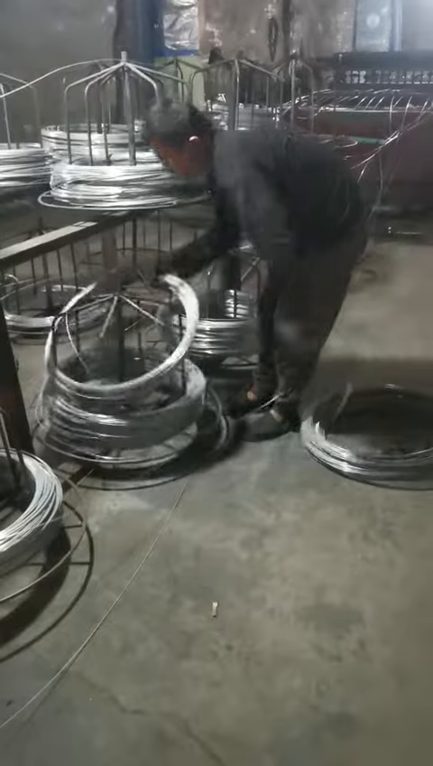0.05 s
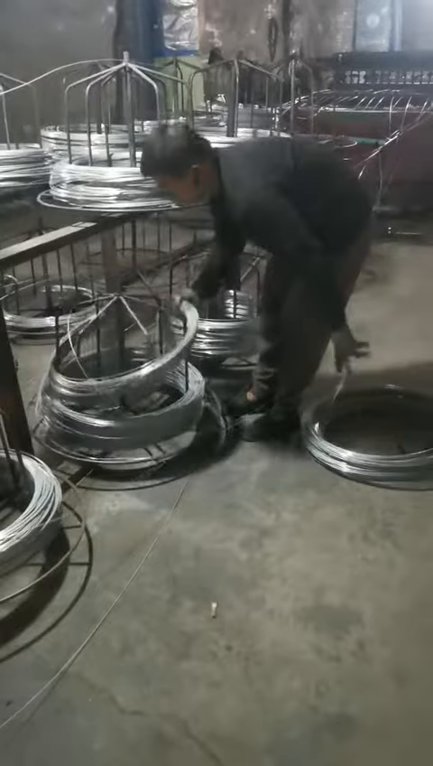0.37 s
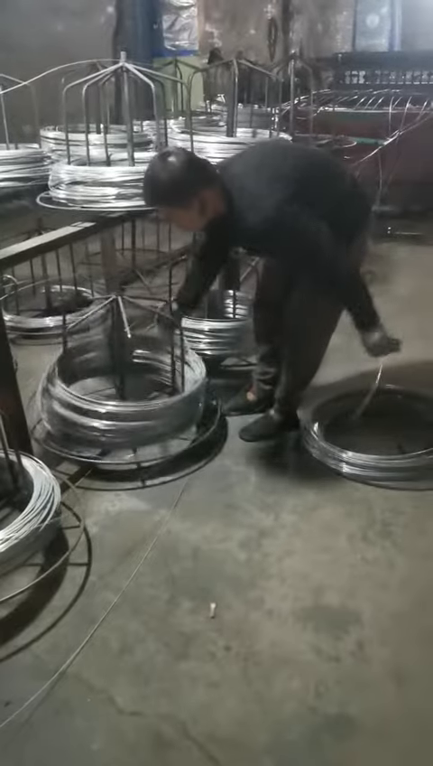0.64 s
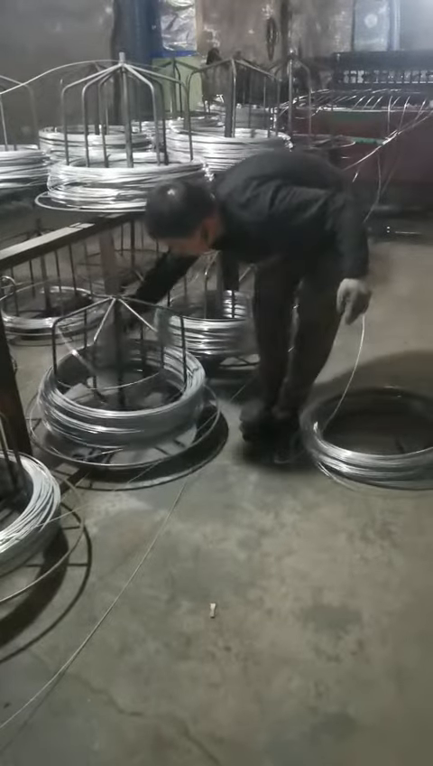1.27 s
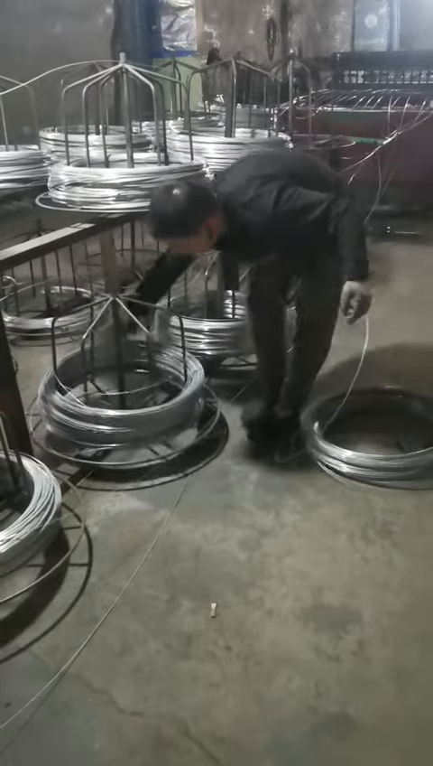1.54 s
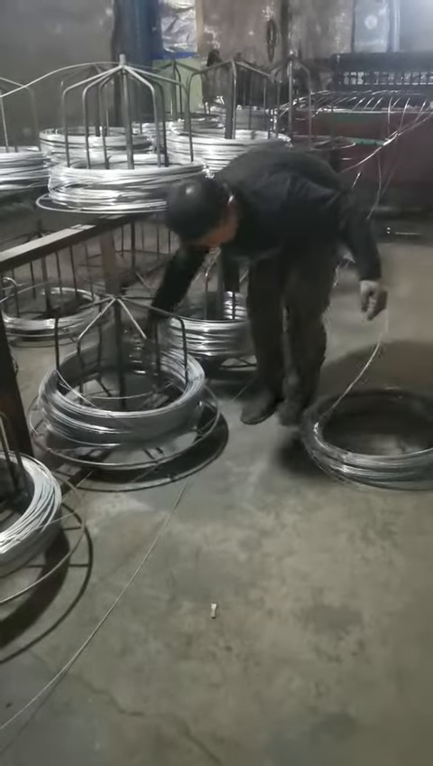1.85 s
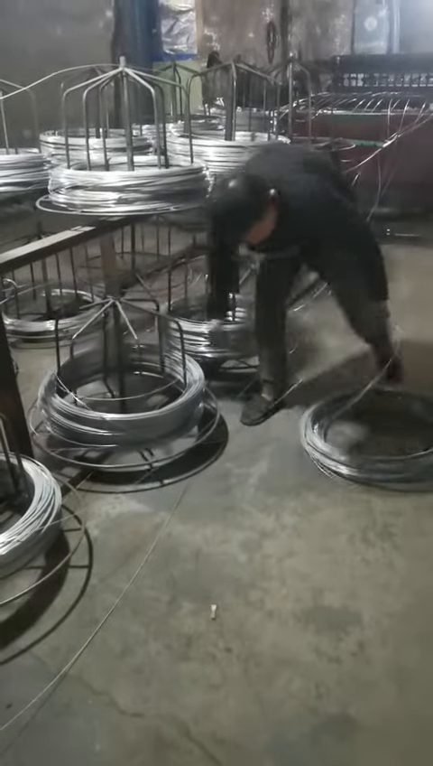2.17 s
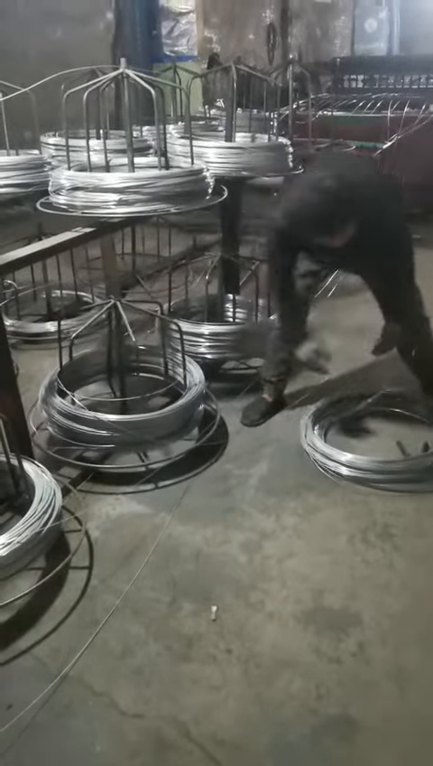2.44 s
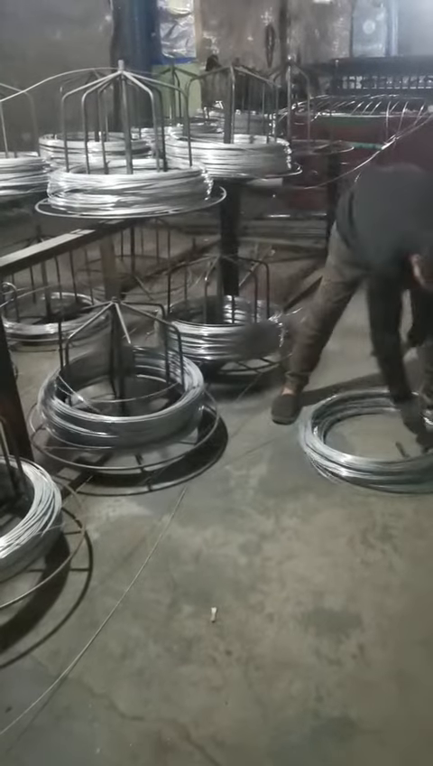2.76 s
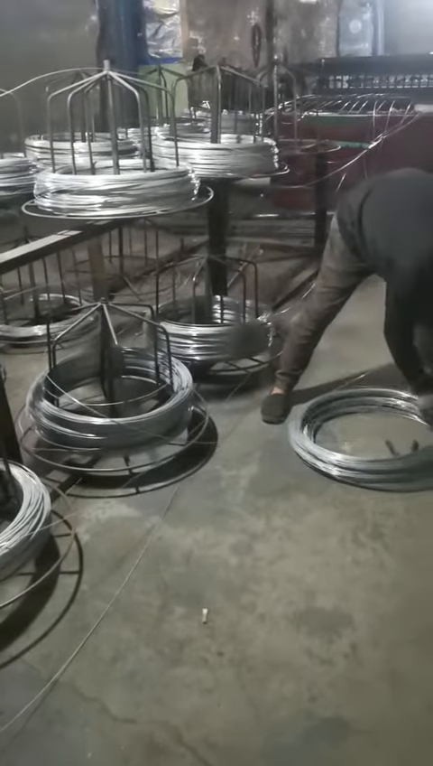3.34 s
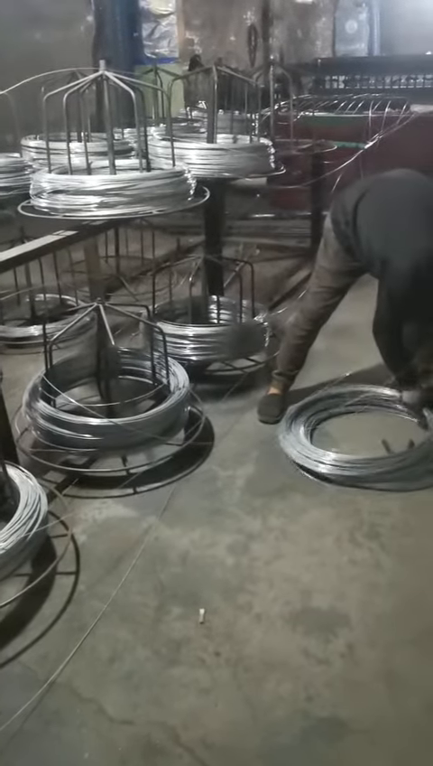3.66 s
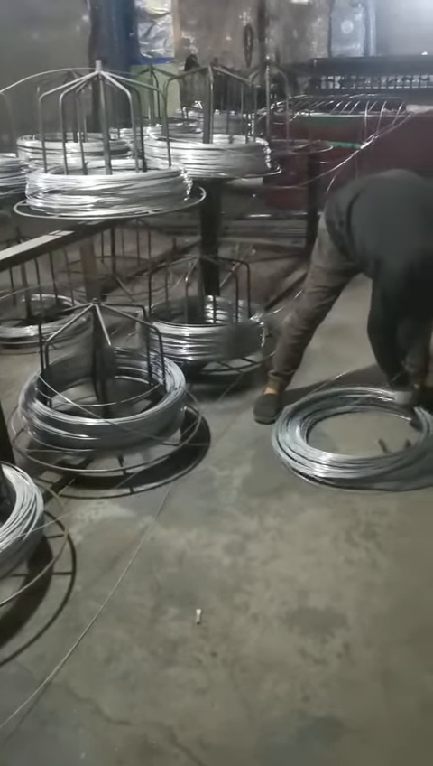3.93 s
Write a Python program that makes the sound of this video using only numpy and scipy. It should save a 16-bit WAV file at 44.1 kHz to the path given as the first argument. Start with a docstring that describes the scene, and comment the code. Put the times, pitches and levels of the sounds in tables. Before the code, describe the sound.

A steel wire coil drops onto a metal stand, clanking and rattling over low machine hum.

```python
"""In a hard-walled workshop, a coil of steel wire drops over a wire stand, off to the right.
Its turns hiss as they rub past each other, knock the frame so that it rings, and rattle as they settle.
One freed turn sings on. A shoe taps and scuffs the concrete, and a second coil is nudged along the floor.
Behind it all are a soft rumble and the hum of a machine, which fades near the end."""
import sys
import numpy as np
from scipy import signal
from scipy.fft import rfft, irfft, next_fast_len
from scipy.io import wavfile
from scipy.ndimage import uniform_filter1d

SR = 44100
rng = np.random.default_rng(int(sys.argv[2]) if len(sys.argv) > 2 else 0)


def write(x):
    x = np.atleast_2d(x).T
    wavfile.write(sys.argv[1], SR, np.round(np.clip(x, -1, 1) * 32767).astype(np.int16))


N = 176400  # 4 seconds

# A COLOUR table says how strong low and high pitches are; a LOUDNESS table, how a sound swells and fades.
# Background rumble and hiss
AIR_TONE_COLOUR = [(20, -5.5), (50, 9), (100, 5), (180, 2.5), (380, 0), (600, -8.5), (1000, -14),
                   (1400, -11.5), (2000, -16.5), (3000, -17.5), (5000, -29.5), (7800, -28), (10000, -49),
                   (15000, -47.5)]  # f/Hz, level/dB
AIR_LOUDNESS = [(0, -47.5), (.22, -50), (.38, -63), (.8, -54.5), (2.6, -54), (3.2, -54), (3.6, -58.5),
                (4, -59)]  # t/s, level/dB
# The machine's hum
HUM_TONES = [(50, -71.5, 0), (76.6, -52.5, 1), (91.6, -59.5, 1), (120, -74.5, 0.9), (152, -60.5, 0.41),
             (167.2, -62, 0.4), (215.8, -65.5, 0.6), (260.9, -66.5, 1), (300.2, -66, 0.05)]  # f/Hz, level/dB, how much the tone follows HUM_LOUDNESS (0 to 1)
HUM_LOUDNESS = [(0, 0), (.2, 3.5), (.4, -9), (.6, -6), (.85, -1.5), (3.1, -2), (3.3, -10.5), (3.6, -15),
                (4, -30)]  # t/s, level/dB
# Wire sliding on wire
SLIDE_LOUDNESS = [(0, -48.5), (.08, -62), (.19, -63.5), (.23, -50), (.335, -43.5), (.365, -38.5),
                  (.395, -37.5), (.425, -42.5), (.5, -48), (.6, -46.5), (.635, -51.5), (.67, -44),
                  (.72, -52.5), (.83, -54), (.97, -55), (1.12, -60), (1.18, -57.5), (1.22, -59),
                  (1.28, -53.5), (1.46, -63.5), (1.55, -52), (1.66, -67), (1.8, -74), (2.1, -93)]  # t/s, level/dB
SLIDE_TONE_COLOUR = [(300, -17), (1500, -40.5), (2600, -16), (3000, -7), (3400, -18), (5000, -10.5),
                     (6000, -9.5), (7000, -2.5), (7800, 3.5), (8600, -6.5), (9800, -12), (15000, -18.5)]  # f/Hz, level/dB
# Small bumps between the settling turns
RATTLE_LOUDNESS = [(0, -46.5), (.2, -57.5), (.4, -55.5), (.5, -44.5), (.62, -47.5), (.74, -50),
                   (.93, -48.5), (1.2, -51.5), (1.35, -56), (1.55, -56), (1.8, -63.5), (2.2, -67),
                   (2.7, -75)]  # t/s, level/dB
RATTLE_TONE_COLOUR = [(200, -17), (500, -2.5), (1050, -5.5), (1500, -1.5), (1900, 2.5), (2400, -2.5),
                      (2950, 2), (3350, -1.5), (4400, -3), (5700, -10), (8000, -14.5), (15000, -41)]  # f/Hz, level/dB
# Blows on the stand: t/s, level/dB, body/dB (up to 1150 Hz), middle/dB (2000 Hz), edge/dB (4600 Hz),
# treble/dB (from 7500 Hz), ringing/dB, right minus left/dB
BLOWS = [(0.001, -38.5, 12.5, 1.5, -0.5, -4, 1, 9), (0.270, -35, -2.5, -0.5, 7, -4.5, 1, 4),
         (0.432, -27.5, -0.5, -1.5, 2, 3.5, 0.5, 4.5), (0.537, -31.5, -4.5, -2, 1, -1, -6, 3),
         (0.773, -32, -11, 5, 4, 0, -0.5, 6), (0.793, -35.5, -9, -4, 8, 6, -11, 0),
         (0.884, -33.5, 1, 5, 5, -4.5, -4.5, 5.5), (1.010, -29, 0.5, -0.5, -1, -4.5, -2.5, 4.5),
         (1.150, -38, -6, -4.5, -0.5, -6, -1, 5), (1.248, -35.5, -6.5, -1, 0.5, -4, -6, 2),
         (1.606, -46, -9, 3, -1, -5, -9, 2.5), (1.676, -49, -12, 5, 3, 0, -7, 2),
         (1.853, -33.5, -2, -1, 2.5, -5, -3, 1)]
BLOW_COLOUR = [(60, -10), (200, -11), (360, -6), (520, -5.5), (760, -2), (1050, 6.5), (1350, -2.5),
               (1530, -17.5), (1720, -2.5), (2100, -0.5), (2450, -6.5), (3000, 6.5), (3300, -1.5),
               (3650, 0.5), (4500, -3), (5700, -11.5), (7600, -7.5), (9500, -20.5), (15000, -35)]  # f/Hz, level/dB
# Strongest ringing tones of stand and coil: f/Hz, level/dB, t60/s (the time to die away by 60 dB)
STAND_TONES = [(375, 1.5, 0.45), (935, 3, 0.22), (978, -11.5, 0.59), (1070, 0.5, 0.31), (1152, 3, 0.42),
               (1663, 2.5, 0.3), (1967, -4, .45), (2040, -7, 0.56), (2950, 2, 0.75), (3045, 4, 0.13),
               (3055, -2.5, 0.1), (3170, -36, 0.51), (3870, -29, 0.77), (4060, -24, 0.71), (4630, -8, 0.68)]
# The bright zip at the fastest moment of the slide: f/Hz, level/dB
ZIP_TONE_COLOUR = [(1000, -41), (4000, -16), (6500, -13), (7700, -1), (8600, 7), (9800, -5), (12000, -9),
                   (15000, -11)]
# Tones of the freed turn: f/Hz, level/dB, t60/s
SINGING_TONES = [(1178, -55, 0.64), (1224, -57, 0.57), (970, -56, 0.27), (2940, -61, 0.97),
                 (3600, -59, 1.2), (3590, -59, 1.3), (3770, -57.5, 1.0), (3830, -60, 1.2), (3940, -63, .8),
                 (4830, -59.5, 0.66)]
# The shoe's hard tap, gritty scuff and soft step: f/Hz, level/dB
SHOE_TAP_COLOUR = [(80, -15), (350, -2), (850, 2), (1400, -8), (2500, -8), (3500, -28), (7000, -50),
                   (15000, -65)]
SHOE_SCUFF_COLOUR = [(300, -7), (1000, -23), (1700, -13), (2600, 2.5), (3400, -1), (5500, -9), (12000, -44)]
SHOE_STEP_COLOUR = [(60, -15), (150, -15), (240, 2.5), (370, 2.5), (550, -7.5), (1000, -15.5), (3000, -49)]
# The second coil dragging on the floor
DRAG_LOUDNESS = [(2.3, -97), (2.39, -71), (2.44, -52.5), (2.53, -53.5), (2.56, -59), (2.62, -52),
                 (2.7, -59.5), (2.85, -59), (2.94, -67.5), (3.1, -72), (3.32, -68), (3.42, -60.5),
                 (3.52, -62.5), (3.62, -72), (3.8, -65.5), (4, -71.5)]  # t/s, level/dB
DRAG_TONE_COLOUR = [(500, -20), (2000, -10), (2750, -7.5), (3000, -0.5), (3250, -6.5), (5200, -6),
                    (6800, -3.5), (7700, 3), (8700, -6), (10000, -11), (15000, -16.5)]  # f/Hz, level/dB


def amp(db):
    """Turn decibels into a number to multiply by."""
    return 10 ** (np.asarray(db) / 20)


def unit(x):
    """Scale a signal to an average power of 1."""
    return x / np.sqrt(np.mean(x ** 2))


def follow(points):
    """A volume curve drawn through (t/s, level/dB) points."""
    return amp(np.interp(np.arange(N) / SR, *np.array(points).T))


def fade(t, t60):
    """Die away by 60 dB in t60 seconds."""
    return np.exp(-np.log(1000) * t / t60)


def let_through(x, kind, hz, order):
    """Keep the low pitches, the high ones or a band between."""
    return signal.sosfilt(signal.butter(order, hz, kind, fs=SR, output="sos"), x)


def colour(x, points):
    """Shape the tone with (f/Hz, level/dB) points; plain white noise keeps its power."""
    size = next_fast_len(x.shape[-1] // 2 + 2048) * 2
    hz, db = np.array(points, float).T
    grid_hz = np.arange(size // 2 + 1) * SR / size
    gain = unit(amp(np.interp(np.log(grid_hz + 1), np.log(hz), db)))
    # Rearrange the filter so that it rings after a click, never before it.
    cepstrum = irfft(np.log(gain))
    cepstrum[1:size // 2] *= 2
    cepstrum[size // 2 + 1:] = 0
    return irfft(rfft(x, size) * np.exp(rfft(cepstrum)))[..., :x.shape[-1]]


def place(pair, pan_db, width):
    """One signal is the centre, the other spreads it above the bass; pan_db leans it all to the right."""
    side = width * let_through(pair[1], "high", hz=760, order=1)
    return np.array([pair[0] + side, pair[0] - side]) * amp([[-pan_db / 2], [pan_db / 2]])


def wander(per_s):
    """A smooth random drift, mostly between -1 and 1."""
    hold = int(SR / per_s)
    steps = np.repeat(rng.standard_normal(N // hold + 1), hold)
    return 1.3 * uniform_filter1d(uniform_filter1d(steps, hold), hold)[:N]


def grains(per_s, spread_db):
    """Two unrelated streams of random clicks of uneven size."""
    clicks = (rng.random((2, N)) < per_s / SR) * rng.choice([-1, 1], (2, N))
    return unit(clicks * amp(spread_db * np.minimum(rng.exponential(size=(2, N)), 3)))


def dying_tones(t, hz, t60):
    """One fading pure tone for each way the metal can vibrate."""
    t, hz, t60 = (np.asarray(v, np.float32) for v in (t, hz, t60))
    return np.sin(2 * np.pi * hz[:, None] * t) * np.exp(-t / t60[:, None] * np.float32(np.log(1000)))


def room(x, build_up_s=0.0084):
    """The hard walls send back a wash of echoes; the treble dies slightly sooner."""
    t = np.arange(SR) / SR
    noise = rng.standard_normal((2, SR))
    low = let_through(noise, "low", hz=4000, order=2) * fade(t, t60=0.53)
    high = let_through(noise[::-1], "high", hz=4000, order=2) * fade(t, t60=0.5)
    tail = (low + high) * np.minimum(t / build_up_s, 1) ** 2
    return signal.fftconvolve(x, unit(tail) / np.sqrt(SR), axes=1)[:, :N]


def workshop_air():
    """Distant rumble and hiss, narrow in the bass and wide in the treble."""
    air = colour(rng.standard_normal((2, N)), AIR_TONE_COLOUR)
    return place(air, pan_db=4, width=1) * follow(AIR_LOUDNESS) * amp(1.1 * wander(8.45))


def machine(waver_db=1.7):
    """A turning shaft and the mains supply hum in low, wavering tones."""
    t = np.arange(N) / SR
    volume, hum = follow(HUM_LOUDNESS), 0
    for hz, db, share in HUM_TONES:
        phase = 2 * np.pi * (hz * t + rng.random()) + 0.16 * wander(3.7)
        hum += np.sqrt(2) * amp(db + waver_db * wander(4.86)) * volume ** share * np.sin(phase)
    return place([hum, 0 * hum], pan_db=3, width=0)


def sliding(loudness, tone_colour, pan_db):
    """Rubbing wire catches and slips so often that the tiny clicks blend into a hiss."""
    rub = grains(per_s=5000, spread_db=2) * amp(1.5 * wander(40))
    rub = unit(rub + amp(-2) * room(rub))
    return place(colour(rub, tone_colour), pan_db, width=1) * follow(loudness)


def settling():
    """Loose turns tick against each other, blurred by the room's echo."""
    ticks = grains(per_s=700, spread_db=3)
    ticks = unit(ticks + amp(3.5) * room(ticks))
    return place(colour(ticks, RATTLE_TONE_COLOUR), pan_db=4.5, width=1) * follow(RATTLE_LOUDNESS)


def knocks(tone_count=360, detune=0.012, scatter_db=4, rise_s=0.0023, bounce_s=0.03):
    """Each blow of the coil cracks, bounces and sets the wire and the stand ringing."""
    t = np.arange(SR) / SR
    wire_hz = 250 + 9000 * rng.random(tone_count) ** 1.3  # the many weak tones of the loose turns
    wire = dying_tones(t, wire_hz, t60=0.52 * 2 ** rng.uniform(-1.11, 1, tone_count))
    stand_hz, stand_db, stand_t60 = np.array(STAND_TONES).T
    out = np.zeros((2, N + SR))
    for start, db, body_db, mid_db, edge_db, treble_db, ring_db, pan_db in BLOWS:
        snap = amp(-0.5) * fade(t, t60=0.023)  # the first contact
        crack = rng.standard_normal((2, SR)) * (fade(t, t60=0.088) + snap) * (1 - np.exp(-t / rise_s))
        turns = rng.standard_normal((2, tone_count)).astype(np.float32) @ wire * np.sqrt(2 / tone_count)
        # The shifting coil presses on the stand differently at each blow, which nudges its pitches.
        stand = dying_tones(t, stand_hz * (1 + detune * rng.standard_normal(len(stand_hz))), stand_t60)
        strengths = amp(stand_db + scatter_db * rng.standard_normal((2, len(stand_hz))))
        ringing = (strengths * rng.choice([-1, 1], strengths.shape)) @ stand
        for delay in bounce_s * rng.random(size=4):
            bounce = (t > delay) * fade(abs(t - delay), t60=0.025) * rng.standard_normal((2, SR))
            crack += amp(-14) * np.exp(-delay / 0.06) * bounce  # later bounces are weaker
        blow = colour(crack + amp(ring_db - 15.5) * turns, BLOW_COLOUR) + amp(ring_db - 22.5) * ringing
        tone = [(300, body_db), (1150, body_db), (2000, mid_db),
                (3100, 0), (4600, edge_db), (7500, treble_db)]
        blow = colour(blow, tone) * amp(treble_db / 2)
        first = int(start * SR)
        out[:, first:first + SR] += amp(db) * place(blow, pan_db, width=0.92)
    return out[:, :N] + amp(-6) * room(out[:, :N])


def zip_past(peak_s=0.372, half_length_s=0.03):
    """Turns of wire skim quickly over each other with a bright zip."""
    t = np.arange(N) / SR
    rub = grains(per_s=14000, spread_db=1) * np.exp(-((t - peak_s) / half_length_s) ** 4)
    return amp(-38) * place(colour(rub, ZIP_TONE_COLOUR), pan_db=1, width=0.6)


def singing(start_s=1.856, rise_s=0.0093, waver_db=3.5):
    """After the last knock, a freed turn rings on in a few wavering tones."""
    t = np.arange(N) / SR - start_s
    tones = np.zeros((2, N))
    for hz, db, t60 in SINGING_TONES:
        for row in range(2):
            phase = 2 * np.pi * (hz * t + rng.random()) + 1.9 * wander(40)
            tones[row] += amp(db + waver_db * wander(30.66)) * fade(abs(t), t60) * np.sin(phase)
    return place(tones * np.clip(t / rise_s, 0, 1), pan_db=3.5, width=0.81)


def shoe(tap_s=2.303, scuff_s=2.47, step_s=2.48):
    """A hard tap on the concrete, then a soft step with a gritty scuff of the sole."""
    t = np.arange(N) / SR
    tap = rng.standard_normal((2, N)) * (t > tap_s) * fade(abs(t - tap_s), t60=0.014)
    tap = amp(-36) * place(colour(tap, SHOE_TAP_COLOUR), pan_db=2.5, width=0.54)
    grit = grains(per_s=9000, spread_db=5) * np.exp(-((t - scuff_s) / 0.049) ** 2)
    thud = rng.standard_normal((2, N)) * np.exp(-((t - step_s) / 0.023) ** 2)
    step = amp(-50.5) * colour(grit, SHOE_SCUFF_COLOUR) + amp(-47) * colour(thud, SHOE_STEP_COLOUR)
    both = tap + place(step, pan_db=3, width=0.21)
    return both + amp(-4) * room(both)


def scene():
    """Add up both coils, the shoe and the workshop behind them."""
    first_coil = knocks() + zip_past() + singing() + settling()
    first_coil += sliding(SLIDE_LOUDNESS, SLIDE_TONE_COLOUR, pan_db=2)
    second_coil = sliding(DRAG_LOUDNESS, DRAG_TONE_COLOUR, pan_db=0)
    return first_coil + second_coil + shoe() + machine() + workshop_air()


def record(dry, shade_hz=3030, shade_db=-2, top_hz=15300):
    """Make the left side a little duller than the right, and cut the very highest treble."""
    band = let_through(dry, "band", hz=[shade_hz / 2, shade_hz * 2], order=1)
    heard = dry + band * (amp([[shade_db * 2 / 3], [-shade_db / 3]]) - 1)
    return signal.sosfilt(signal.ellip(10, .2, 80, top_hz, fs=SR, output="sos"), heard)


dry = scene()
out = record(dry)
write(out)
```